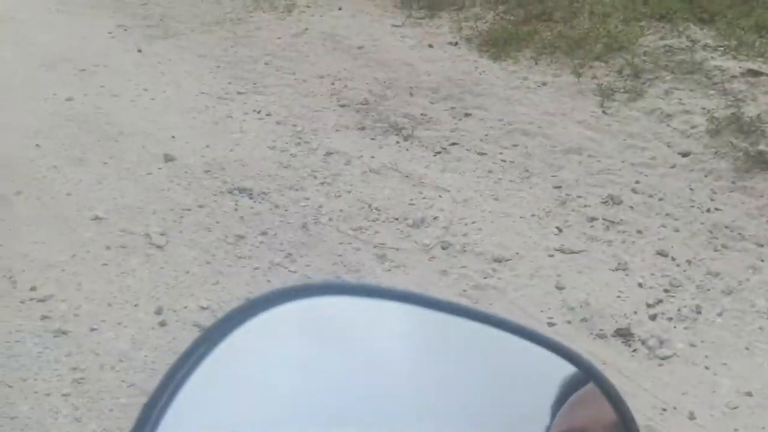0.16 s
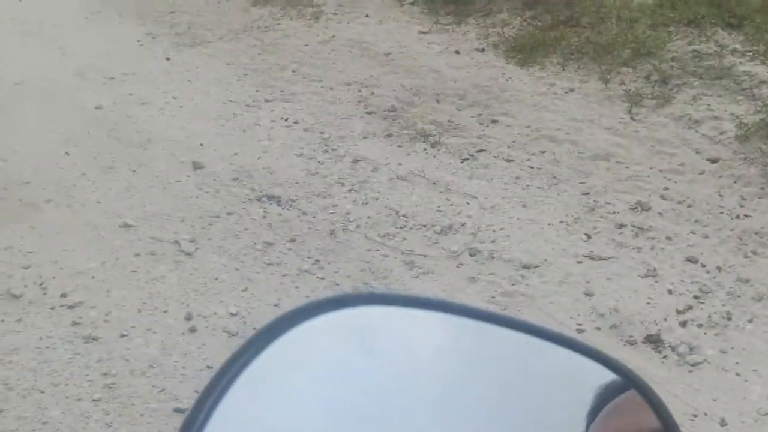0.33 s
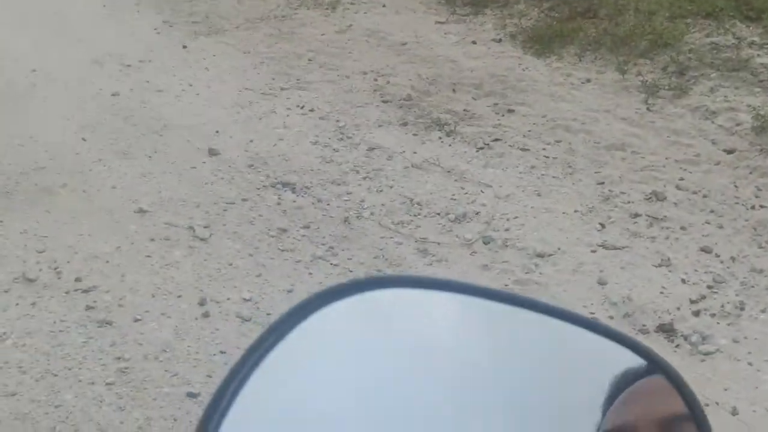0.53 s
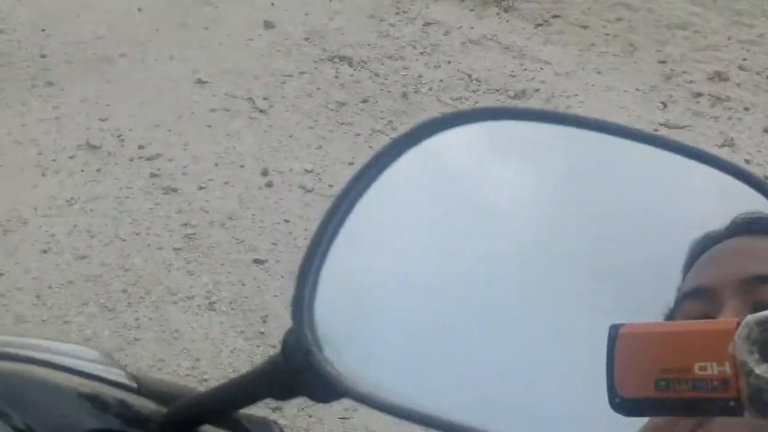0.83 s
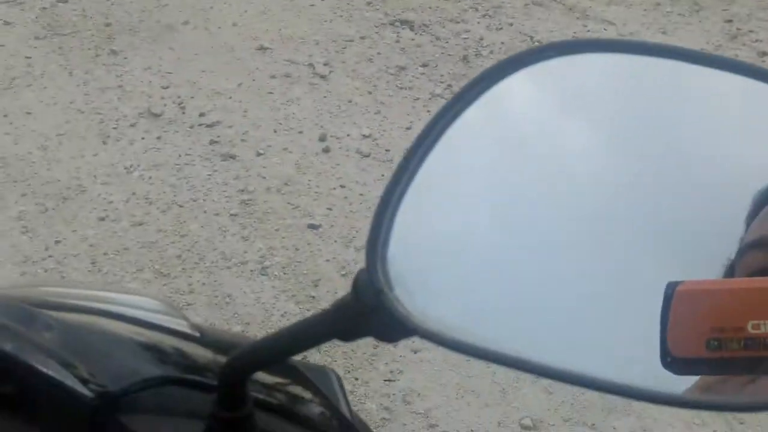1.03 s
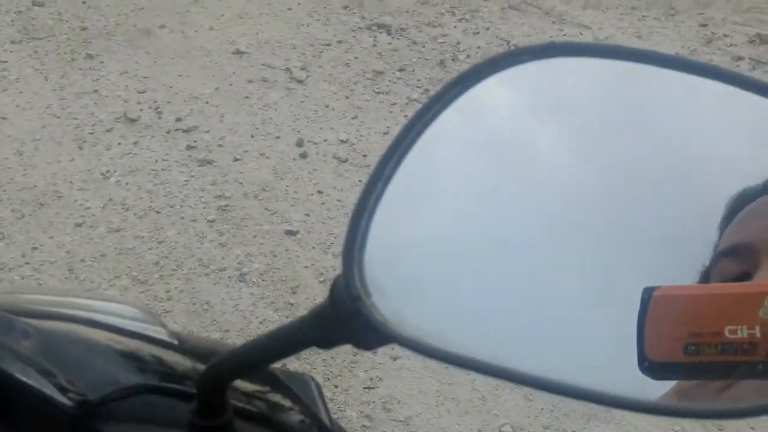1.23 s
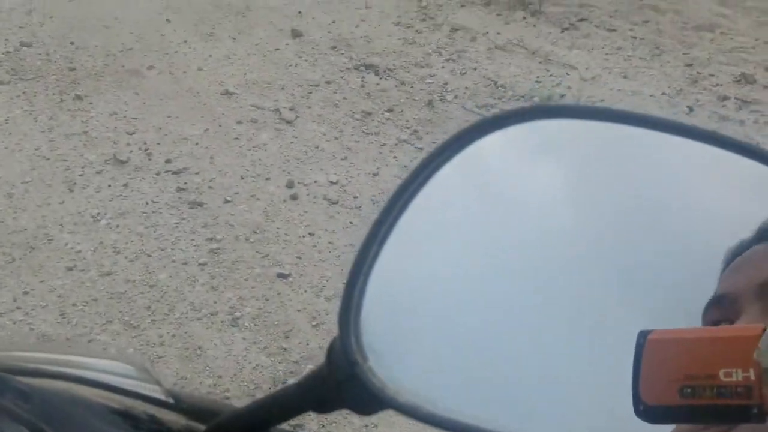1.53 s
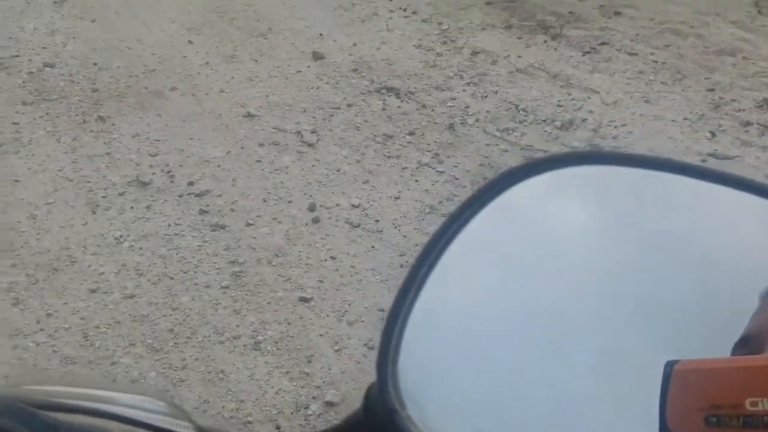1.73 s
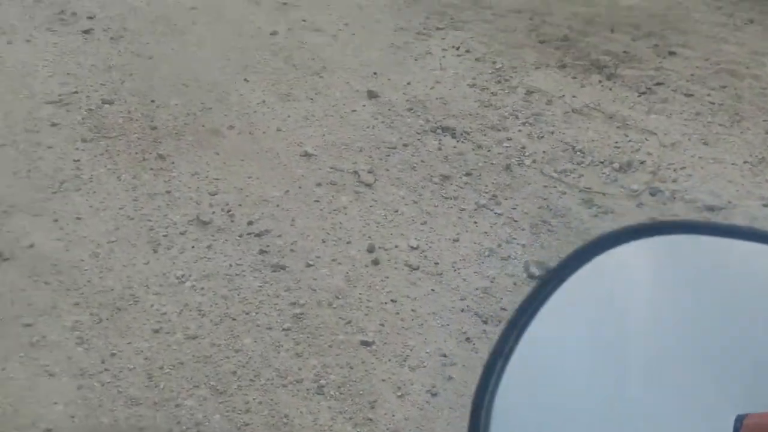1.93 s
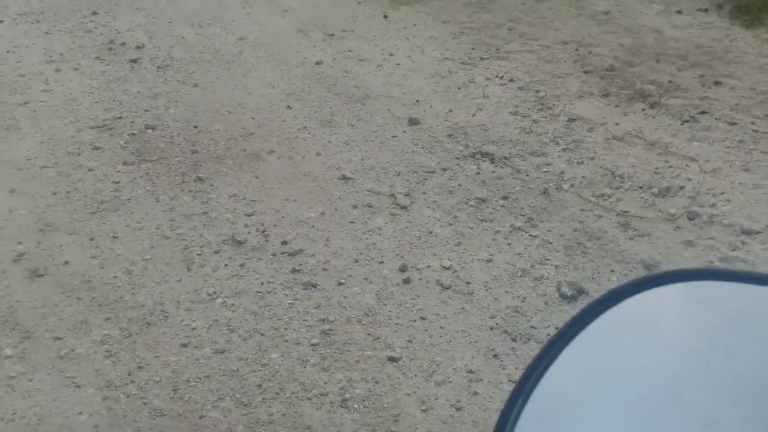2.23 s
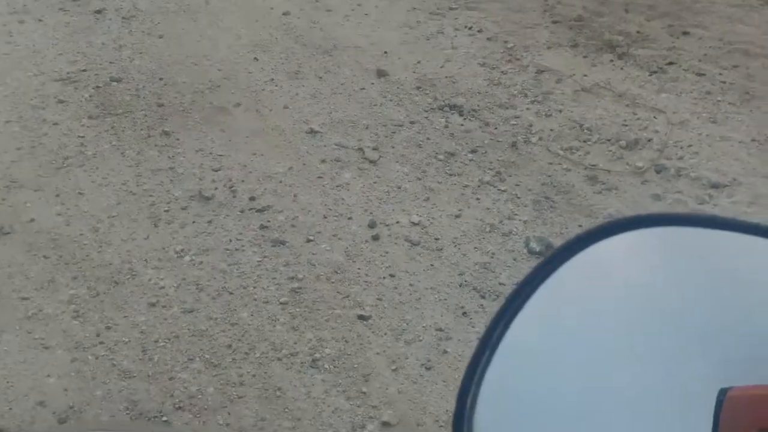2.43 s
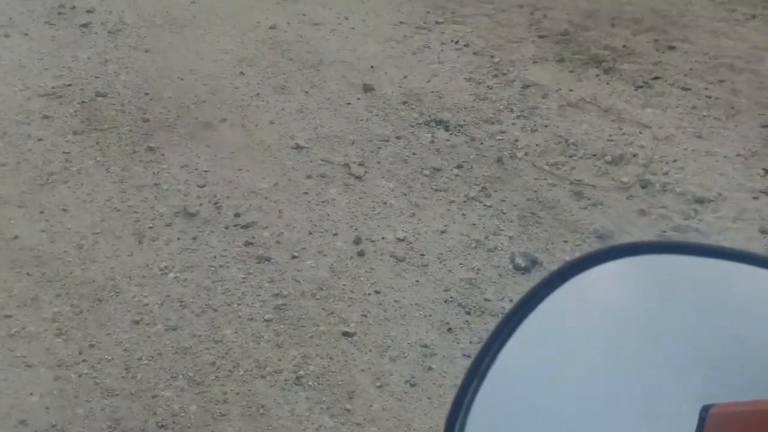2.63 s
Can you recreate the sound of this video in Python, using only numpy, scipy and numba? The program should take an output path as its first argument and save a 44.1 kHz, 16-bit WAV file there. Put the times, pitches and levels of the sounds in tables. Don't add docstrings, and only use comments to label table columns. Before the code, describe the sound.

A small motorcycle engine idles with low, uneven thumping pulses, then starts revving at the end

```python
import sys
import numpy as np
from scipy import signal
from scipy.fft import rfft, irfft
from scipy.io import wavfile
from scipy.ndimage import uniform_filter1d
from numba import njit

SR = 44100
rng = np.random.default_rng(int(sys.argv[2]) if len(sys.argv) > 2 else 0)


def volts(x):
    e = np.asarray(x, float) / 20
    return 10 ** e


def wav_record(signal):
    frames = np.transpose(np.atleast_2d(signal))
    bounded = np.clip(frames, -1, 1)
    quanta = np.round(bounded * 32767).astype(np.int16)
    wavfile.write(sys.argv[1], SR, quanta)


N = 122157
IDLE_HZ = 14


def set_rms(x, db):
    return x * volts(db) / np.sqrt(np.mean(x ** 2))


@njit
def svf(x, hz, width_hz):
    y, band, low = np.empty(len(x)), 0., 0.
    g, k = np.tan(np.pi * hz / SR), width_hz / hz
    for i in range(len(x)):
        v = (band + g * (x[i] - low)) / (1 + g * (g + k))
        band, low = 2 * v - band, low + 2 * g * v
        y[i] = k * v
    return y


def svf_twice(x, hz, width_hz):
    hz, width_hz = float(hz), float(width_hz)
    return svf(svf(x, hz, width_hz), hz, width_hz)


def walk(rate_hz):
    hold = int(SR / rate_hz)
    steps = np.repeat(rng.standard_normal(N // hold + 1), hold)
    return 1.24 * uniform_filter1d(uniform_filter1d(steps, hold), hold)[:N]


def coloured(spectrum):
    hz, db = np.array(spectrum).T
    f = np.maximum(np.arange(N // 2 + 1) * SR / N, 1)
    gain = volts(np.interp(np.log(f), np.log(hz), db))
    return irfft(rfft(rng.standard_normal(N)) * gain, N)


def follow(t, curve):
    return np.interp(t, *np.array(curve).T)


def puffs(t, starts, length_s, sizes):
    k = np.clip(np.searchsorted(starts, t) - 1, 0, None)
    length_s = np.broadcast_to(length_s, starts.shape)
    progress = np.clip((t - starts[k]) / length_s[k], 0, 1)
    return sizes[k] * np.sin(np.pi * progress) ** 2


# (time [s], speed [cycles/s])
CRANK_SPEED = [(0.0, 14.852), (0.25, 14.427), (0.5, 14.225), (0.75, 14.142), (0.95, 14.461), (1.15, 14.46),
               (1.35, 13.935), (1.55, 13.823), (1.75, 14.063), (1.95, 13.794), (2.15, 13.412),
               (2.35, 13.457), (2.47, 13.489), (2.57, 14.257), (2.65, 15.302), (2.72, 17.498),
               (2.77, 19.272)]
START_CYCLE = -.237


def crank(t):
    speed = follow(t, CRANK_SPEED)
    phase = START_CYCLE + np.cumsum(speed) / SR
    cycles = np.interp(np.arange(int(phase[-1]) + 1), phase, t)
    load = np.maximum(speed - IDLE_HZ - .5, 0)
    return phase, cycles, load


# (time [s], cylinder pressure [1 full, below 0 suction])
POOR_BURNS = [(0.084, 0.71), (0.22, -0.56), (0.359, 0.87), (0.57, 0.8), (0.71, -0.45), (0.851, 0.38),
              (0.99, -0.44), (1.129, 0.5), (1.269, -0.03), (1.411, 0.16), (1.556, 0.47), (2.134, 0.82),
              (2.283, 0.85), (2.432, -0.1)]
# (frequency [Hz], width [Hz])
MUFFLER = [(73.7, 41.7), (129.1, 30.7)]
# (frequency [Hz], width [Hz], level [dB])
PIPE_OVERTONES = [(163.6, 22, -22), (289.7, 35, -23), (341.5, 9.1, -25.5)]
BURN, CARRY, SCATTER, LOAD_GAIN = 1.0, .11, .045, .22
BLOW_START_S, BLOW_S, BLOW_DB = -.00835, .0129, 8.2
PUSH_START_S, PUSH_S, PUSH_DB = -.0009, .0245, -16.3
SHUT_START_S, SHUT_S, SHUT_DB = .01015, .005, -6.4
PIPE_HZ, PIPE_WIDTH_HZ = 68.6, 18.
FRONT_S, RASP_DB = .0023, -40
SHORTEN = .06


def exhaust(t, cycles, load):
    burn = BURN + LOAD_GAIN * np.tanh(load) + SCATTER * rng.standard_normal(len(cycles))
    for s, pressure in POOR_BURNS:
        k = np.argmin(abs(cycles - s))
        burn[k] = pressure
        burn[k + 1] += CARRY * (BURN - pressure)
    quick = 1 / (1 + SHORTEN * load)

    puff = puffs(t, cycles + BLOW_START_S, BLOW_S, burn)
    shut = puffs(t, cycles + SHUT_START_S * quick, SHUT_S, np.ones(len(cycles)))
    blow = volts(BLOW_DB) * puff + volts(SHUT_DB) * shut
    for hz, width_hz in MUFFLER:
        blow = svf(blow, float(hz), float(width_hz))

    stroke = puffs(t, cycles + PUSH_START_S, PUSH_S * quick, quick ** 2)
    push = svf(np.gradient(stroke) * SR / PIPE_HZ, PIPE_HZ, PIPE_WIDTH_HZ)

    front = puffs(t, cycles + BLOW_START_S, FRONT_S, burn)
    overtones = sum(volts(db) * svf_twice(front, hz, 1.5 * width_hz) for hz, width_hz, db in PIPE_OVERTONES)
    rasp = svf(puff * rng.standard_normal(N), 240.0, 180.0)
    return blow + volts(PUSH_DB) * push + overtones + volts(RASP_DB) * rasp


# (share of cycle [0-1], level [dB])
VALVE_SEATS = [
    (.34, 0),
    (.84, -1),
]
# (frequency [Hz], width [Hz], level [dB], tick gating [0-1])
CASE_MODES = [(573.4, 88, -4.5, 0.42), (772.6, 38, -4.5, 0.58), (866, 82, -6.5, .4), (1076, 130, -11, 0.1),
              (1368, 120, -15, 0.2), (1624, 110, -16.5, 0.1), (2700, 580, -22.5, 0.1)]
# (frequency [Hz], density [dB per Hz])
WHIRR = [(110, -39), (190, -5.5), (298, -8), (389, -8.5), (700, -7.5), (768, -1), (990, -17.5), (3000, -33),
         (3900, -57), (6600, -120)]
# (time [s], level [dB])
MIC_FACING = [(0, 1.5), (.6, 0), (1.3, 0), (2.0, 0), (2.5, -1.5), (2.77, 0)]
CASES_DB, CASES_LOAD_DB, WHIRR_DB = -51, 1, -54
TICK_S, TICK_SCATTER_DB = .0068, 1.5


def cases(t, phase, load):
    ticks = 0
    for share, db in VALVE_SEATS:
        late_s = (phase - share) % 1 / (IDLE_HZ + load)
        size = volts(db + TICK_SCATTER_DB * rng.standard_normal(60))
        cycle = np.floor(phase - share + 2).astype(int)
        ticks = ticks + size[cycle] * late_s / TICK_S * np.exp(1 - late_s / TICK_S)
    ring = 0
    for hz, width_hz, db, gating in CASE_MODES:
        drive = (1 - gating + 2 * gating * ticks) * volts(0.85 * walk(5.97)) * rng.standard_normal(N)
        ring = ring + set_rms(svf_twice(drive, hz, 1.67 * width_hz), db)
    whirr = set_rms(coloured(WHIRR), WHIRR_DB) * (1.07 + .5 * ticks)
    return (set_rms(ring, CASES_DB) + whirr) * volts(CASES_LOAD_DB * load + follow(t, MIC_FACING))


# (time [s], level [dB])
SHIELD_LEVEL = [(0.0, -50), (0.04, -42), (0.08, -60), (0.44, -67), (0.47, -51), (0.96, -61.5),
                (1.06, -44.5), (1.13, -55), (1.68, -57), (1.72, -43), (1.77, -63), (1.79, -47.5),
                (1.96, -57), (2.21, -46), (2.27, -64), (2.28, -51.5), (2.72, -48), (2.76, -52)]
SHIELD_HZ, SHIELD_WAVER_HZ = 773, 8.93


def shield(t):
    hz = SHIELD_HZ + SHIELD_WAVER_HZ * walk(14)
    level_db = follow(t, SHIELD_LEVEL) - 1.5 + 1.6 * walk(29.98)
    return np.sqrt(2) * volts(level_db) * np.sin(2 * np.pi * np.cumsum(hz) / SR)


# (time [s], rumble level [dB])
GUSTS = [(0.0, -24.5), (0.18, -37), (0.24, -25), (0.31, -29.5), (0.63, -32.5), (0.91, -26), (0.95, -28),
         (1.23, -35), (1.3, -27), (1.41, -33), (1.44, -35), (1.59, -21.5), (1.67, -33), (1.97, -35.5),
         (2.0, -33), (2.76, -30)]
# (time [s], length [s], level [dB])
WIND_BUFFETS = [(0.055, 0.08, -57), (0.266, 0.042, -59), (0.592, .02, -42), (0.724, 0.054, -48.5),
                (0.796, 0.032, -44), (1.02, 0.015, -47), (1.108, 0.07, -50), (2.41, 0.028, -58),
                (2.564, 0.022, -51)]
WIND_HZ, WIND_WIDTH_HZ = 30.2, 45.7
FLUTTER_HZ, FLUTTER_WIDTH_HZ = 198, 210


def wind(t):
    rumble = set_rms(svf_twice(rng.standard_normal(N), WIND_HZ, WIND_WIDTH_HZ), 0)
    rumble = svf(rumble, 45.0, 92.0) * volts(follow(t, GUSTS))
    flutter = set_rms(svf_twice(rng.standard_normal(N), FLUTTER_HZ, FLUTTER_WIDTH_HZ), 0)
    buffets = sum(volts(db) * np.exp(-((t - s) / length_s) ** 2) for s, length_s, db in WIND_BUFFETS)
    return rumble + flutter * volts(1.2 * walk(55)) * buffets


# (frequency [Hz], density [dB per Hz])
PREAMP_HISS = [(1180, -26), (2000, -1), (6660, -3), (8120, -5), (8770, -4), (15600, -5.5)]
# (frequency [Hz], level [dB])
WHINES = [(5184, -79), (7881, -75), (11822, -87), (14718, -86), (15525, -83), (15584, -85), (15644, -86),
          (15703, -83)]
HISS_DB = -57.5
BUZZ_RATE_HZ, BUZZ_FIRST_S, BUZZ_S, BUZZ_DB = 10, .07, .012, 1.4
BUZZ_TONE_HZ, BUZZ_TONE_DB = 8274, -72


def camera(t):
    offset = ((t - BUZZ_FIRST_S) * BUZZ_RATE_HZ + .5) % 1 - .5
    buzz = np.exp(-offset ** 2 / (BUZZ_S * BUZZ_RATE_HZ) ** 2) * volts(2.0 * walk(9.9))
    hiss = set_rms(coloured([(20, -37), (600, 2)] + list(PREAMP_HISS)), HISS_DB)
    hiss = hiss * volts(BUZZ_DB * buzz + 0.63 * walk(45.1))
    whines = sum(np.sqrt(2) * volts(db) * np.sin(2 * np.pi * (hz * t + rng.random())) for hz, db in WHINES)
    return hiss + whines + volts(BUZZ_TONE_DB) * buzz * np.sin(2 * np.pi * BUZZ_TONE_HZ * t)


# (time [s], peak level [dB])
KNOCKS = [(0.1413, -43.5), (0.4485, -47), (0.5232, -52), (0.603, -41.5), (0.7, -50.5), (0.7952, -44),
          (0.8424, -44), (1.0145, -42), (1.1189, -46), (1.209, -46.5), (1.6874, -46.5), (1.8292, -59),
          (2.0808, -47.5), (2.229, -61), (2.2804, -67), (2.5476, -42), (2.6709, -38), (2.7346, -37)]
# (frequency [Hz], width [Hz], level [dB])
CLACK_MODES = [(297, 340, 2), (590, 140, 8), (774, 89, 4), (1390, 86, -3.5), (1620, 180, -7),
               (2740, 160, -11.5)]
CLACK_S, CLACK_DB = .0025, 1


def clacks(t):
    hits = sum(volts(db + CLACK_DB) * (t > s) * np.exp(-np.abs(t - s) / CLACK_S) for s, db in KNOCKS)
    hits = hits * rng.standard_normal(N)
    ring = 0
    for hz, width_hz, db in CLACK_MODES:
        gain = volts(db) * np.sqrt(SR / width_hz / 4)
        ring = ring + gain * svf_twice(hits, hz, 1.15 * width_hz)
    return ring


def scene():
    t = np.arange(N) / SR
    phase, cycles, load = crank(t)
    engine = exhaust(t, cycles, np.interp(cycles, t, load)) + cases(t, phase, load) + shield(t) + clacks(t)
    return (engine + wind(t) + camera(t))[None]


def top_cut(x):
    return signal.sosfilt(signal.butter(12, 16460, fs=SR, output="sos"), x)


def record(dry):
    low_pass = signal.ellip(14, .3, 60, 15760, fs=SR, output="sos")
    return top_cut(signal.sosfilt(low_pass, dry))


dry = scene()
out = record(dry)
wav_record(out)
```